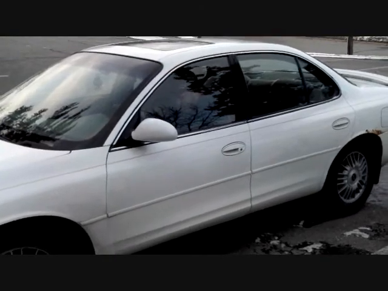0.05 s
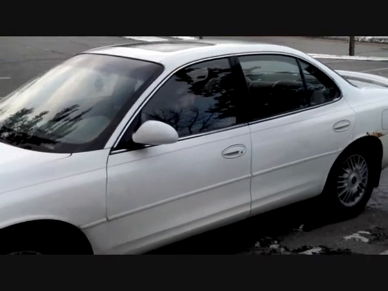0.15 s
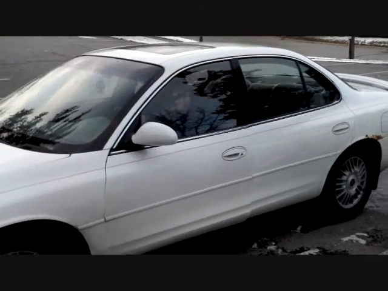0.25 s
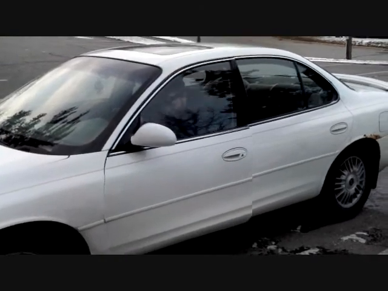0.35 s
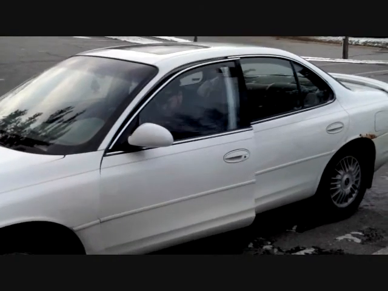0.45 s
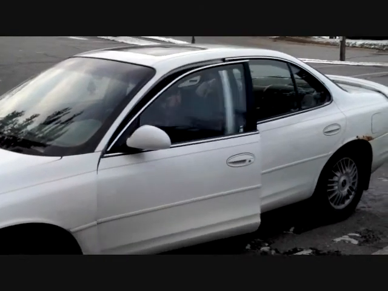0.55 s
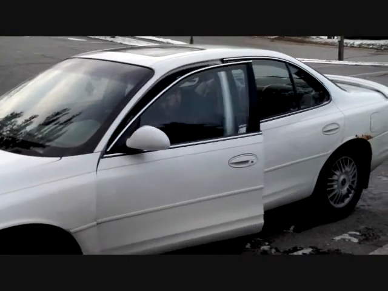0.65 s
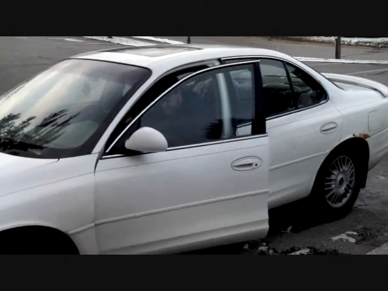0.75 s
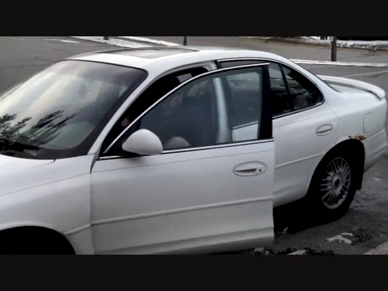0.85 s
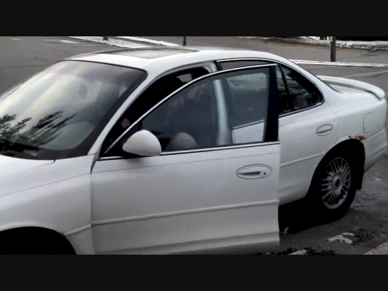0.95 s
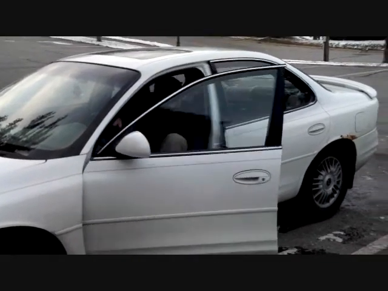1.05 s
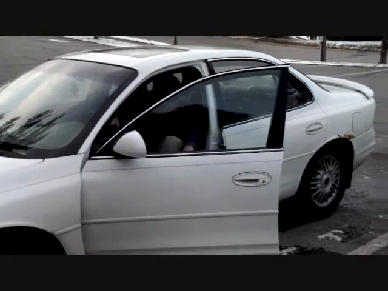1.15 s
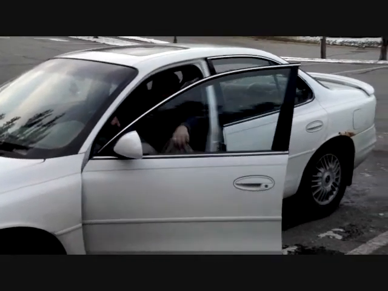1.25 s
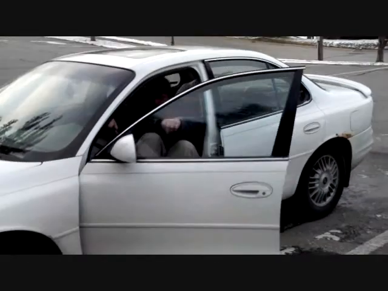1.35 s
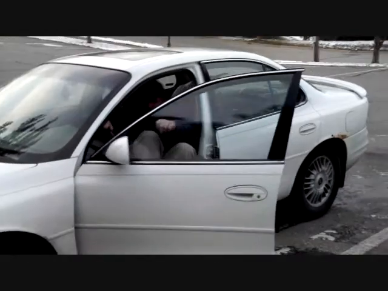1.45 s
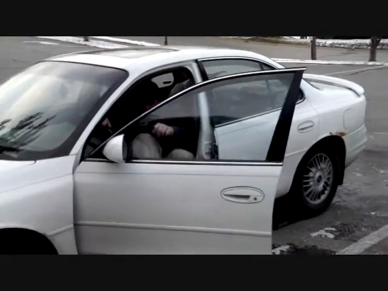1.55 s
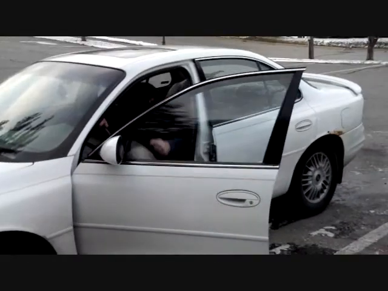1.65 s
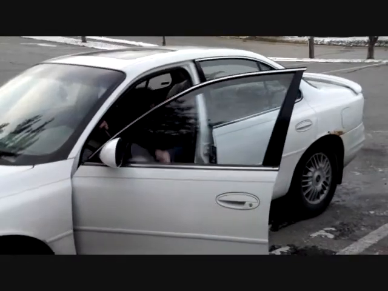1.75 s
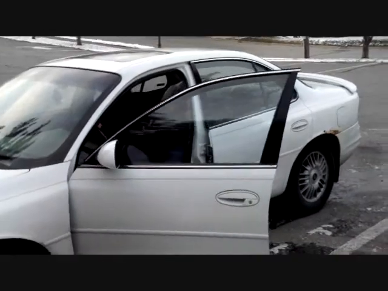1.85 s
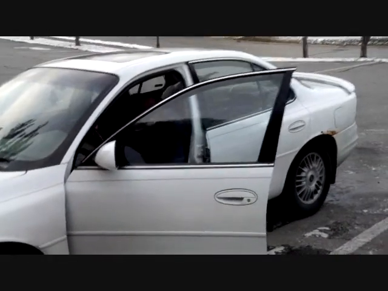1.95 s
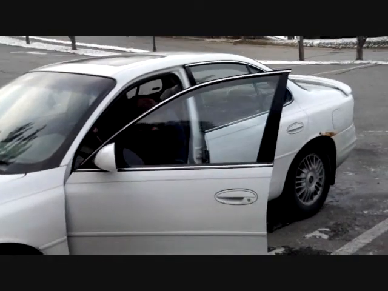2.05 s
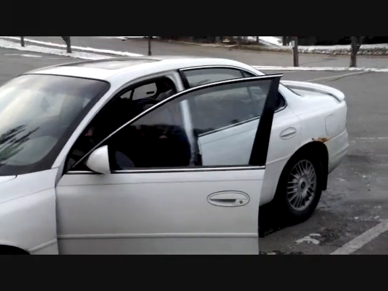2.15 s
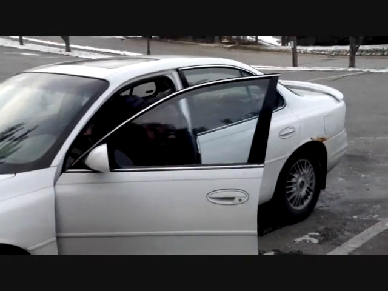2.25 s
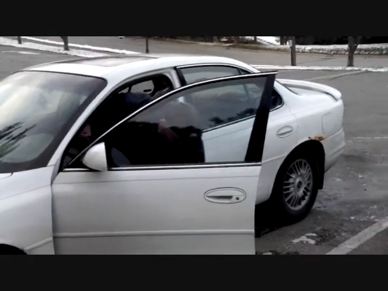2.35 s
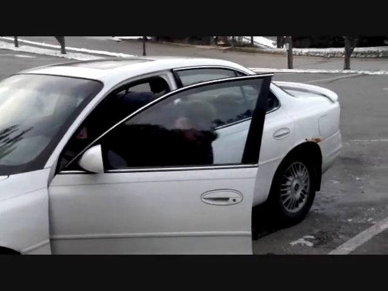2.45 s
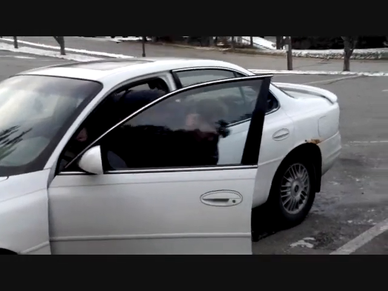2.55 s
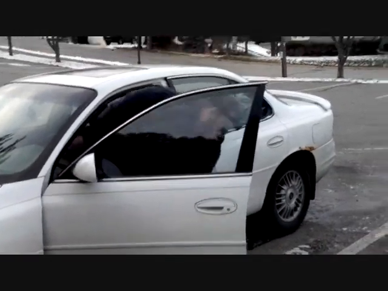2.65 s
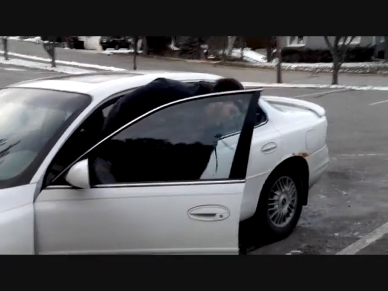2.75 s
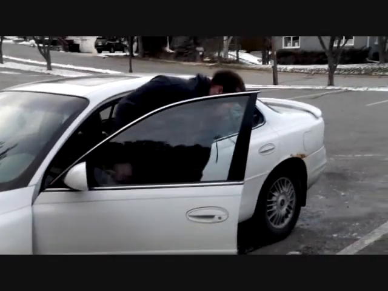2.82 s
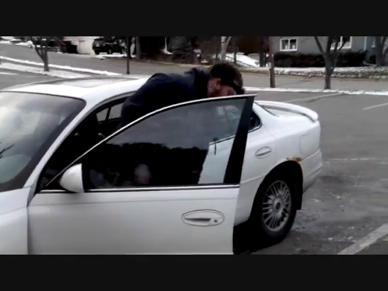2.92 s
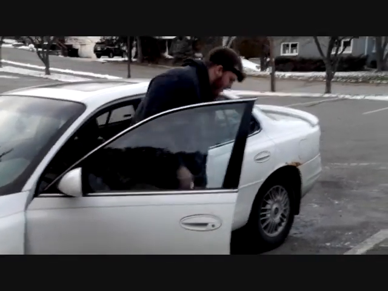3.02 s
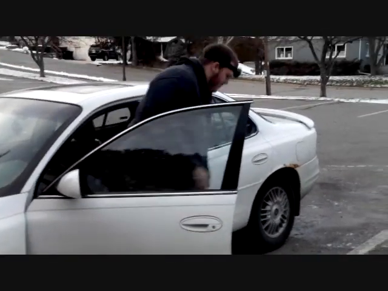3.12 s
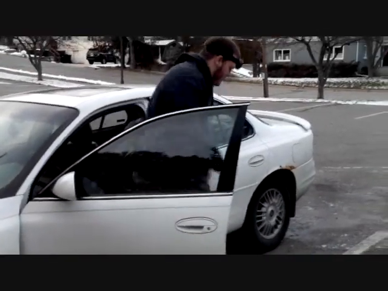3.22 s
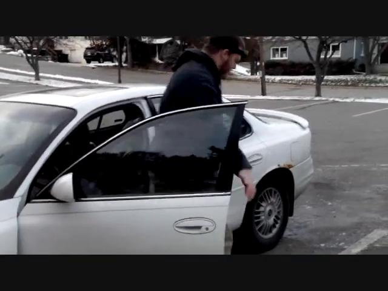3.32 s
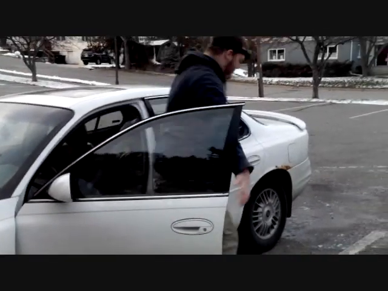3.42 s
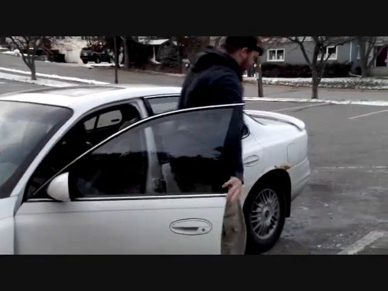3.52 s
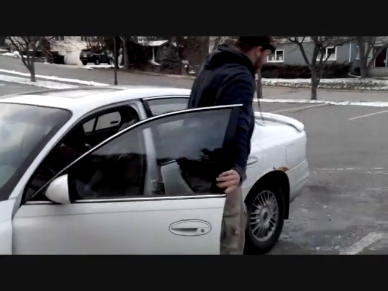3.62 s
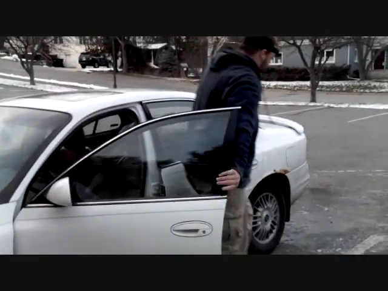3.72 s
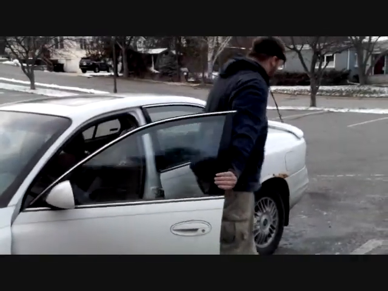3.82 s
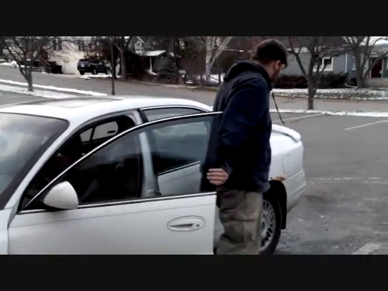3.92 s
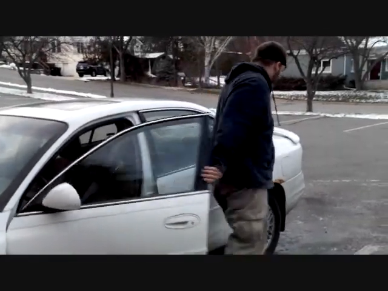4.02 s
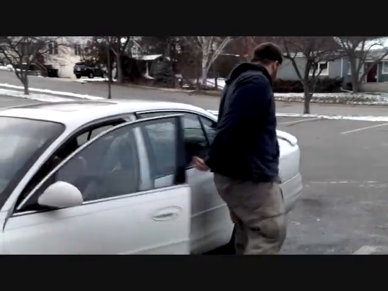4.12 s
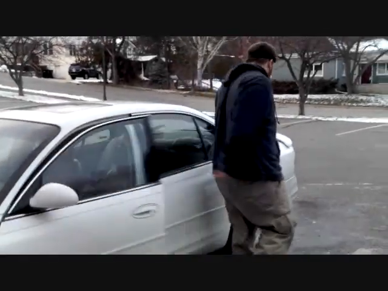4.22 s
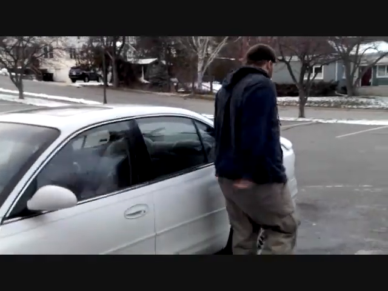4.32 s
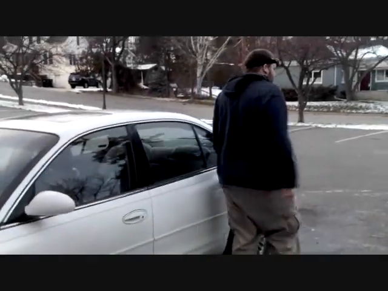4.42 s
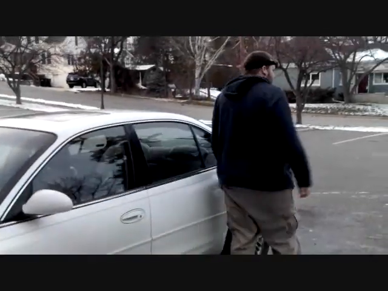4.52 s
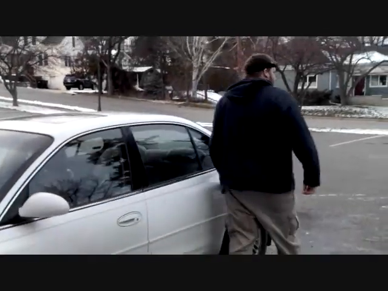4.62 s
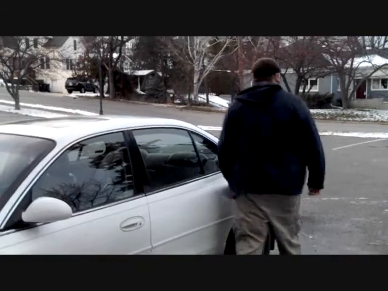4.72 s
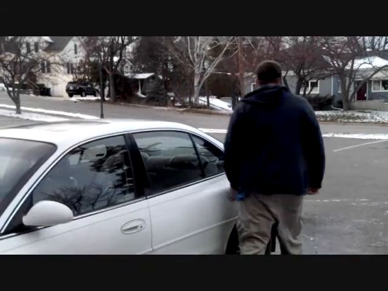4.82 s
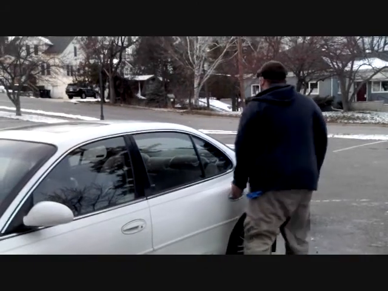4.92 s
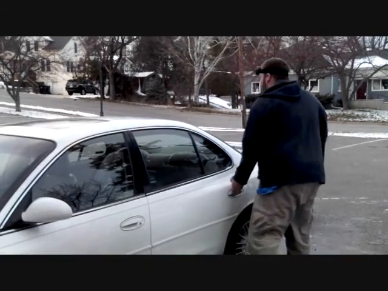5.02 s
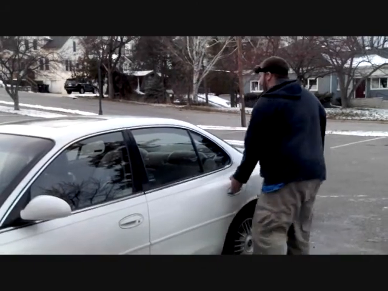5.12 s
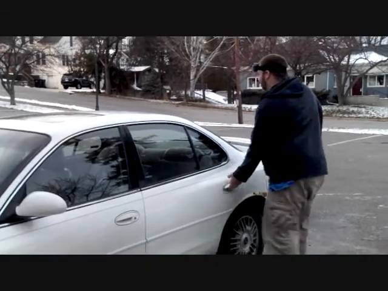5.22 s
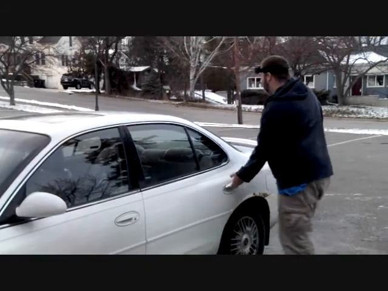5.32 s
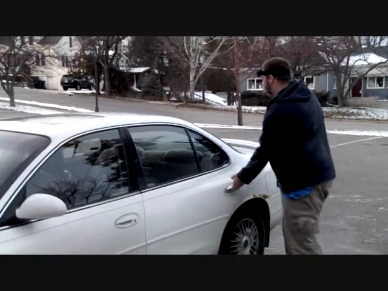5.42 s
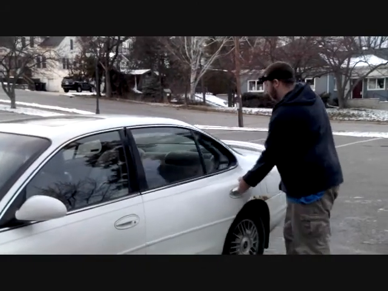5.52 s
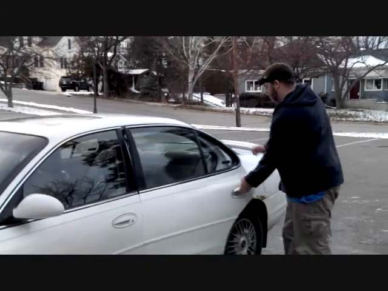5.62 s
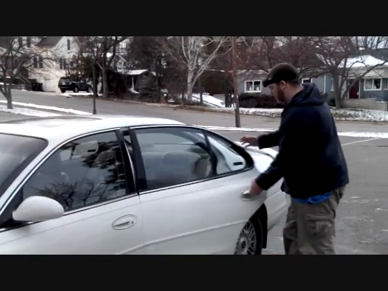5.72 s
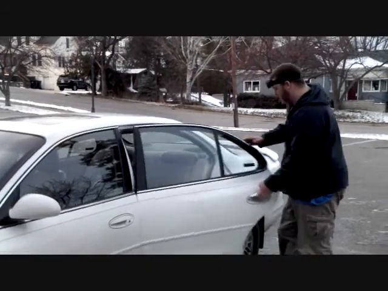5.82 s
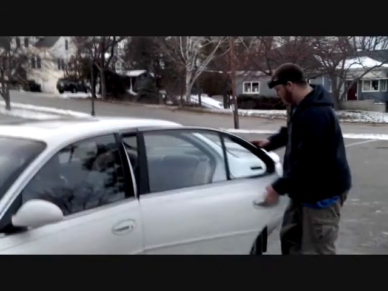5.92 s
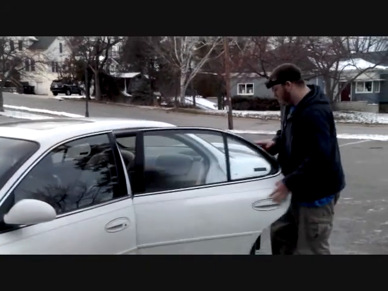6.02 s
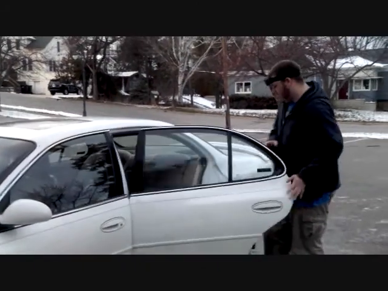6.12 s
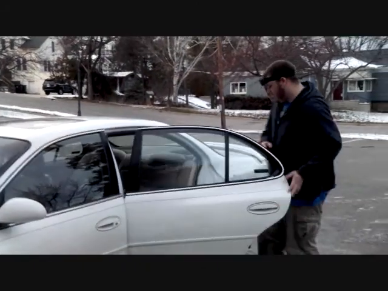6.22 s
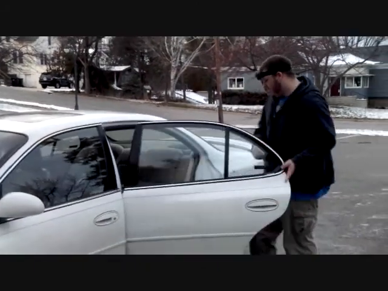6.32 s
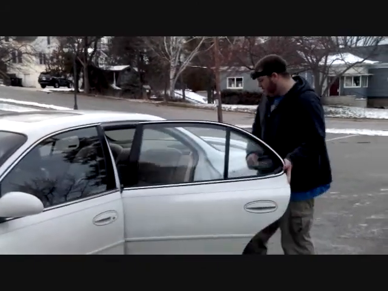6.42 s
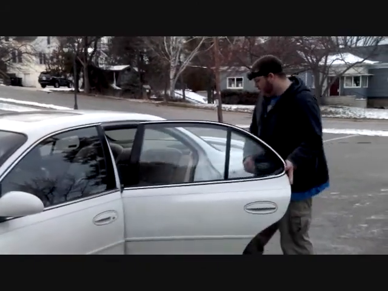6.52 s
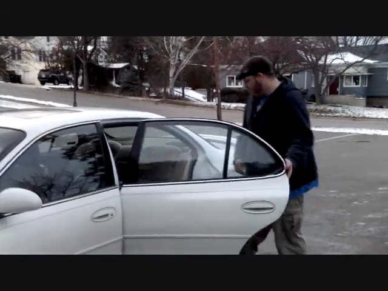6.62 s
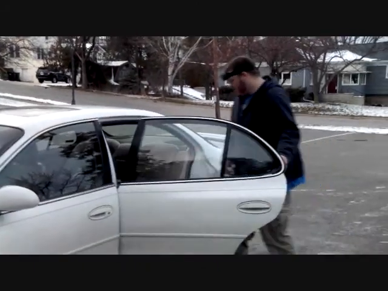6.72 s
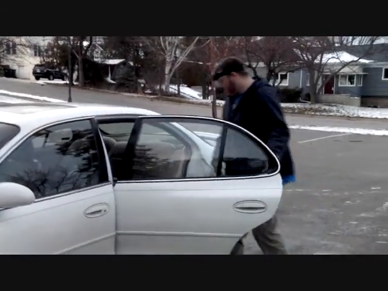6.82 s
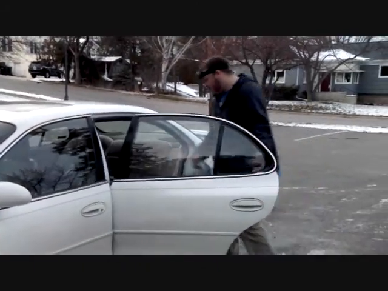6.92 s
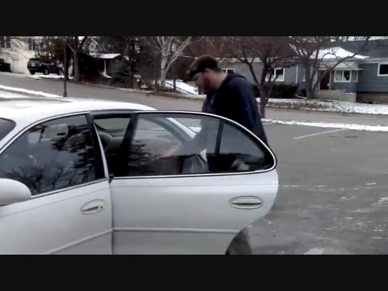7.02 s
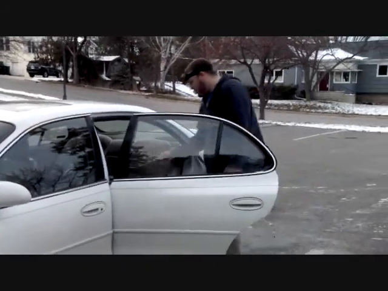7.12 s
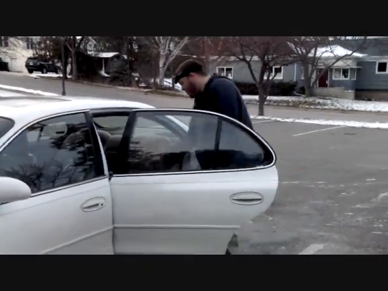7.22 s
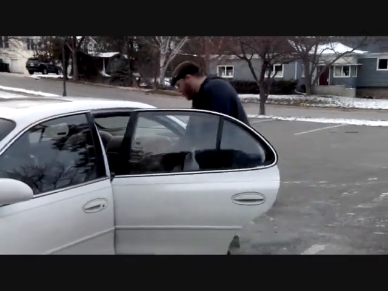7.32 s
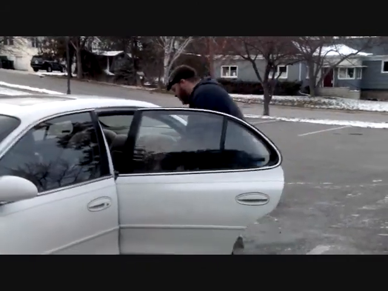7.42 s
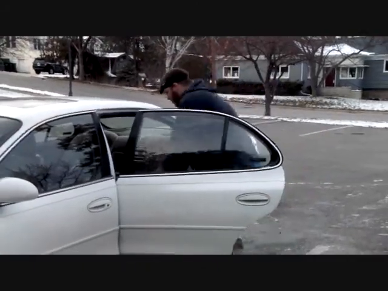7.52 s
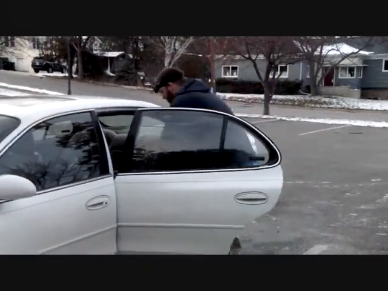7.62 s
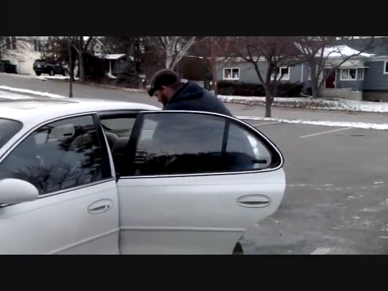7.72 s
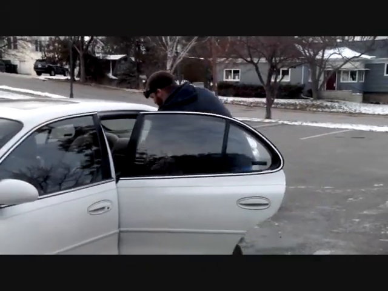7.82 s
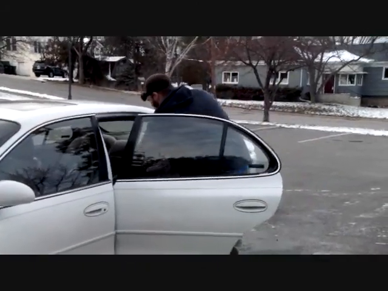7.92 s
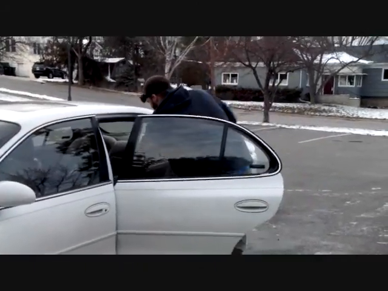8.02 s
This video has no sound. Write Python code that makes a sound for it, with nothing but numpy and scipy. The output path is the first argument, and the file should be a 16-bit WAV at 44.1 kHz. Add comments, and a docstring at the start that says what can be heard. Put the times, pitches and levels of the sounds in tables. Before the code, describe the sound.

A car door unlatches softly and swings open with a clunk. Shoes scuff on asphalt and small metal pieces like keys chink faintly. The hinge squeaks briefly and knocks several times, then the door slams hard enough to overload the nearby microphone. After a few light steps, a handle snaps and a second door pops open. Faint traffic and hiss fill the open parking lot.

```python
"""Car doors in an open parking lot: each contact rings their sheet metal, glass and trim.
The front door unlatches, swings through its hinge notches, is pushed back and slams, pumping the cabin
air. Shoes scuff on asphalt, small metal chinks, then the rear handle snaps and the rear door pops open.
Distant traffic and a faint machine whine lie beneath; the loudest blows overload the microphone."""
import sys
import numpy as np
from scipy import signal
from scipy.fft import rfft, irfft, next_fast_len
from scipy.io import wavfile
from scipy.ndimage import uniform_filter1d

SR = 44100
rng = np.random.default_rng(int(sys.argv[2]) if len(sys.argv) > 2 else 0)


def master_out(mix):
    """Clip the mix to full scale and print it as 16-bit PCM to the path in sys.argv[1]."""
    frames = np.transpose(np.atleast_2d(mix))
    ceiling = np.clip(frames, -1, 1)
    pcm = np.round(ceiling * 32767).astype(np.int16)
    wavfile.write(sys.argv[1], SR, pcm)


N = 355357
TIME_S = np.arange(N) / SR
RING_S = TIME_S[:int(.7 * SR)]  # time axis of one event

# door metal, glass and trim: pitch_hz, level_db, t60_s
DOOR_MODES = [(99.6, -13, 0.3), (122.6, -11, 0.28), (139.2, -8, 0.35), (174, -10.5, .22), (212, -11, 0.38),
              (234.8, -11, 0.31), (286.1, -9.5, 0.28), (352.7, -5, 0.15), (410, -6, 0.18),
              (456.6, -4.5, 0.13), (481.8, -3.5, 0.15), (512, -7.5, 0.21), (635.6, -12.5, 0.22),
              (708, -11, 0.11), (789, -14, 0.099), (892, -7, 0.083), (986, -17.5, 0.084),
              (1207, -17.5, 0.095), (1360, -23, 0.16), (1488, -17.5, 0.15), (1580, -20, 0.058),
              (2527, -25, 0.082), (3090, -27.5, 0.1), (3800, -27, 0.091), (4010, -24, 0.15)]
# dense small modes between them: freq_hz, density_db
DOOR_DENSE = [(55, -24), (105, -1), (450, 1.5), (900, -10), (1550, -11.5), (1900, -21.5), (4100, -21.5),
              (4600, -24.5), (7500, -28.5)]


def door_blow(peak_db, bass_db, treble_db, panel_hz, ring_scale, chatter_s,
              bass_hz=220, treble_hz=2200, panel_db=5, panel_q=6.7, dense_db=-6):
    """One contact and a brief chatter of metal on metal ring the door."""
    body = modes(DOOR_MODES, ring_scale)
    body += undb(dense_db) * noise(DOOR_DENSE, RING_S) * fade(0.17 * ring_scale)
    x = signal.fftconvolve(contact(0.11, chatter_s), body)[:len(RING_S)]
    x *= 1 - np.exp(-RING_S / 0.00013)  # rubber cushions the onset
    # heavy blows move the whole door, hard ones wake the treble, the struck panel speaks most
    hz = freqs(x)
    tilt_db = bass_db / (1 + (hz / bass_hz) ** 4) + treble_db / (1 + (treble_hz / hz) ** 4)
    panel = 1 + undb(panel_db) / (1 + 1j * panel_q * (hz / panel_hz - panel_hz / hz))
    x = irfft(rfft(x) * undb(tilt_db) * panel, len(x))
    # a free door radiates little deep bass
    x = signal.sosfilt(signal.butter(2, 75, "high", fs=SR, output="sos"), x)
    return peak(x * (1 - RING_S / RING_S[-1]), peak_db)


# trapped cabin air: pitch_hz, level_db, t60_s
CABIN_MODES = [(35.7, -23, 0.34), (61.5, -3.5, 0.15), (87.5, -15, 0.54), (97.1, -11.5, 0.45)]
# loose trim and window glass: freq_hz, density_db
TRIM_SPECTRUM = [(60, 3), (100, 24), (260, 14), (700, -1), (1400, 0.5), (1900, -13), (3400, -10),
                 (4050, -3), (4500, -14.5), (7500, -17.5)]


def slam(start_s=4.352, striker_lead_s=.011, rebound_s=.018, cabin_lag_s=.007):
    """Latch meets striker; the door lands, pumps the cabin, shakes the trim and rebounds on its seal."""
    out = np.zeros(N)
    striker = door_blow(-7, bass_db=-13, treble_db=6.5, panel_hz=1100, ring_scale=0.62, chatter_s=0.0073)
    add(out, start_s - striker_lead_s, striker)
    landing = door_blow(6, bass_db=5.5, treble_db=6.5, panel_hz=810, ring_scale=.55, chatter_s=.005)
    add(out, start_s, landing)
    for k in range(2):  # the second is weaker and duller
        rebound = door_blow(-0.5 - 5 * k, bass_db=5, treble_db=3 - 27.5 * k, panel_hz=255,
                            ring_scale=0.83, chatter_s=.004, panel_db=10)
        add(out, start_s + (k + 1) * rebound_s, rebound)
    cabin = modes(CABIN_MODES, ring_scale=0.94, scatter_db=1.0)
    trim = undb(-19.5) * noise(TRIM_SPECTRUM, RING_S) * fade(0.56)
    add(out, start_s + cabin_lag_s, cabin + trim)
    return out


# sprung check arm of the front hinge: pitch_hz, level_db, t60_s
ARM_MODES = [(385, -2, 0.098), (830, -13, 0.11), (875, 2.5, 0.075), (1353, -9, 0.13), (1402, -9.5, 0.15),
             (1507, -11.5, 0.12), (1606, -10.5, 0.084)]
# its notches: start_s, door_db, arm_db, treble_db, panel_hz
NOTCHES = [(1.375, -16, -12, 3, 432), (3.879, -14.5, -15, -1, 720), (3.903, -2.5, -12, -4, 500),
           (3.927, 1.5, -14, -2.5, 427), (3.967, -10.5, -23.5, -2, 370), (4.119, -2.5, -35, -3.5, 357)]


def hinge(arm_lag_s=.002, drop_lag_s=.0075, drop_db=-4.5):
    """At each notch the roller strikes, the sprung arm rings and the roller drops in."""
    out = np.zeros(N)
    for start_s, door_db, arm_db, treble_db, panel_hz in NOTCHES:
        strike = door_blow(door_db, bass_db=5, treble_db=treble_db, panel_hz=panel_hz,
                           ring_scale=0.87, chatter_s=0.0023, bass_hz=150, panel_db=6.5)
        add(out, start_s, strike)
        add(out, start_s + arm_lag_s, peak(modes(ARM_MODES, scatter_db=3.0), arm_db))
        drop = door_blow(door_db + drop_db, bass_db=-12, treble_db=treble_db, panel_hz=panel_hz,
                         ring_scale=0.69, chatter_s=0.0027, bass_hz=260)
        add(out, start_s + drop_lag_s, drop)
    return out


# front and rear latch: start_s, click_db, pop_lag_s, pop_db
LATCHES = [(.511, -22, .013, -23), (5.976, -18.5, 0.0046, -19)]
# rear door skin: pitch_hz, level_db, t60_s
SKIN_MODES = [(200, -17, 0.14)]


def latches(skin_release_s=5.980):
    """Each latch clicks and its door pops off the seal; the rear door's skin springs back."""
    out = np.zeros(N)
    for start_s, click_db, pop_lag_s, pop_db in LATCHES:
        click = door_blow(click_db, bass_db=8, treble_db=7.5, panel_hz=840,
                          ring_scale=0.31, chatter_s=0.0052, treble_hz=2700, dense_db=0.5)
        add(out, start_s, click)
        pop = door_blow(pop_db, bass_db=5, treble_db=-3, panel_hz=400, ring_scale=0.68, chatter_s=0.0046)
        add(out, start_s + pop_lag_s, pop)
    add(out, skin_release_s, modes(SKIN_MODES, scatter_db=3.0))
    return out


# door rattles: start_s, level_db, treble_db, panel_hz, ring_scale
RATTLES = [(1.475, -26.5, 5.5, 1260, 0.46), (1.522, -28, 6.5, 320, 0.76), (3.807, -18, -7, 760, 1.8),
           (4.023, -22.5, -9, 1210, 3.3), (4.072, -16, -2, 408, 2.7), (4.448, -16, -9.5, 960, 0.56)]


def rattles():
    """Loose parts chatter against the panels."""
    out = np.zeros(N)
    for start_s, level_db, treble_db, panel_hz, ring_scale in RATTLES:
        add(out, start_s, door_blow(level_db, bass_db=1.5, treble_db=treble_db, panel_hz=panel_hz,
                                    ring_scale=ring_scale, chatter_s=0.0058))
    return out


# knocks, the first from the rear handle: start_s, thud_db, pitch_ratio, snap_db
KNOCKS = [(5.7937, -6, 0.95, -10), (7.1173, -13.5, 0.85, -36)]
# their hollow body: freq_hz, level_db
KNOCK_SPECTRUM = [(70, -21), (280, -6), (540, 2), (780, 1.5), (900, -5), (1010, -2.5), (1150, -20),
                  (1550, -17.5), (4000, -54)]


def knocks():
    """A heavily damped plastic thud with a hard snap on top."""
    out = np.zeros(N)
    for start_s, thud_db, pitch_ratio, snap_db in KNOCKS:
        thud = impulse([(hz * pitch_ratio, db) for hz, db in KNOCK_SPECTRUM])
        snap = band(rng.standard_normal(len(RING_S)) * fade(0.013), 1300, 8200)
        add(out, start_s, peak(thud, thud_db))
        add(out, start_s, peak(snap, snap_db))
    return out


# one track for the seal, one for the hinge: time_s, pitch_hz, level_db
SQUEAK_TRACKS = [
    [(.385, 2150, -60), (.42, 2240, -48), (.441, 2230, -48), (.456, 2700, -60)],
    [(3.83, 1095, -36), (3.85, 1058, -33), (3.878, 1030, -40)],
]


def squeaks():
    """Stick-slip: an unsteady tone with a weak octave."""
    out = np.zeros(N)
    for track in SQUEAK_TRACKS:
        time_s, pitch_hz, level_db = np.transpose(track)
        unsteady_hz = np.interp(TIME_S, time_s, pitch_hz) * (1 + 0.0097 * walk(280))
        phase = 2 * np.pi * np.cumsum(unsteady_hz) / SR
        out += envelope(time_s, level_db) * (np.sin(phase) + 0.098 * np.sin(2 * phase))
    return out


# shoe and hand taps: start_s, level_db
TAPS = [(1.701, -39.5), (2.224, -30.5), (4.804, -24), (5.292, -30.5), (5.338, -28.5), (5.417, -27),
        (7.07, -39), (7.246, -35), (7.846, -37.5)]
# grit under a sole: start_s, level_db, pitch_hz, decay_s
SCUFFS = [(.374, -34, 4500, 0.0046), (2.227, -41, 3500, 0.054), (2.71, -42.5, 4020, 0.068),
          (2.766, -33, 1700, 0.012), (4.894, -34, 3520, 0.01), (5.457, -33, 4160, 0.011)]


def taps_and_scuffs():
    """Shoes and hands tap dully; soles scrape bright grit."""
    out = np.zeros(N)
    for start_s, level_db in TAPS:
        add(out, start_s, grain_burst(level_db, pitch_hz=880, decay_s=.006, strike=5.8))
    for start_s, level_db, pitch_hz, decay_s in SCUFFS:
        add(out, start_s, grain_burst(level_db, pitch_hz, decay_s))
    return out


def grain_burst(peak_db, pitch_hz, decay_s, strike=0):
    """Decaying grains around one pitch, with an optional first strike."""
    grains = rng.standard_normal(len(RING_S)) * undb(2.06 * rng.exponential(size=len(RING_S)))
    grains[0] += strike
    burst = band(grains * np.exp(-RING_S / decay_s), pitch_hz / 1.75, pitch_hz * 1.16, order=1)
    return peak(band(burst, pitch_hz / 4, pitch_hz * 2.6), peak_db)


# metal contacts: start_s, level_db
CHINKS = [(1.85, -45), (2.066, -38), (2.706, -40), (2.77, -34), (2.798, -38.5), (2.867, -42.5),
          (3.291, -42.5), (3.322, -39)]
# their ring: pitch_hz, level_db, t60_s
CHINK_MODES = [(1570, 0, 0.056), (2750, -4.5, 0.063), (3770, 0.5, 0.07), (4030, -3, 0.14),
               (5370, -6, 0.049)]


def chinks():
    """Small metal parts, like keys, touch, rattle briefly and ring."""
    out = np.zeros(N)
    for start_s, level_db in CHINKS:
        touch = contact(0.083, chatter_s=0.012)
        ring = modes(CHINK_MODES, ring_scale=0.55, detune=0.015)
        scrape = 1.25 * band(rng.standard_normal(len(RING_S)), 1500, 7100) * fade(0.037)
        chink = signal.fftconvolve(touch, ring + scrape)[:len(RING_S)]
        add(out, start_s, peak(chink, level_db))
    return out


# dull rubs: centre_s, level_db, pitch_hz, half_width_s
RUBS = [(.265, -40, 180, 0.031), (1.07, -40, 374, 0.048), (2.412, -40.5, 328, 0.019),
        (5.004, -42.5, 260, 0.068), (5.2, -43, 238, .04)]


def rubs(edge_ratio=1.14):
    """Friction swells in a low band as someone shifts weight and handles the car."""
    out = np.zeros(N)
    for centre_s, level_db, pitch_hz, half_width_s in RUBS:
        friction = unit(band(rng.standard_normal(N), pitch_hz / edge_ratio, pitch_hz * edge_ratio))
        out += undb(level_db) * friction * swell(centre_s, half_width_s)
    return out


def lot_echo(x, echo_db=-27, t60_s=0.51, rise_s=0.02):
    """Add weak, dull scatter from the car body and distant house fronts."""
    tail = band(rng.standard_normal(len(RING_S)), 72, 2200, order=1)
    tail *= fade(t60_s) * (1 - np.exp(-RING_S / rise_s))
    return x + undb(echo_db) * signal.fftconvolve(x, tail / np.linalg.norm(tail))[:N]


# distant road noise: freq_hz, density_db
TRAFFIC_SPECTRUM = [(25, -20), (45, -5), (75, 1.5), (115, 1), (180, -3.5), (290, -2.5), (450, -9),
                    (750, -10.5), (1100, -18.5), (1800, -32.5), (4000, -42)]


def traffic(bed_db=-44, vehicle_db=-41, flutter_db=0.73):
    """One vehicle nears and recedes over a bed of distant traffic."""
    vehicle = undb(vehicle_db) * swell(centre_s=0.92, half_width_s=1)
    rumble = noise(TRAFFIC_SPECTRUM, TIME_S) * np.hypot(undb(bed_db), vehicle)
    return rumble * undb(flutter_db * walk(14))


# whine envelope: time_s, level_db
WHINE_LEVELS = [(.5, -67), (.9, -62), (1.25, -55.5), (1.7, -67), (2.0, -55), (2.55, -67), (3.1, -62.5),
                (3.651, -59), (4.2, -64)]
# lower hums: pitch_hz, level_db, centre_s, half_width_s
HUMS = [(721, -53, 0.48, .9), (497, -52.5, 2.46, .33), (322, -49.5, 3.23, 0.35), (109.6, -48.5, 2.6, 1)]


def machines(whine_hz=1368):
    """Far machines whine and hum, coming and going."""
    whine = envelope(*np.transpose(WHINE_LEVELS)) * wavering_tone(whine_hz)
    hums = sum(undb(level_db) * swell(centre_s, half_width_s) * wavering_tone(pitch_hz)
               for pitch_hz, level_db, centre_s, half_width_s in HUMS)
    return whine + hums


# microphone noise: freq_hz, density_db
HISS_SPECTRUM = [(100, 1), (1500, 4), (2500, 1.5), (4000, 2.5), (5500, 1), (7400, 1.5), (8000, -6.5)]


def hiss(level_db=-55.5):
    """Steady microphone hiss."""
    return undb(level_db) * noise(HISS_SPECTRUM, TIME_S)


def contact(chatter_gain, chatter_s):
    """A unit impulse followed by decaying chatter."""
    force = chatter_gain * rng.standard_normal(len(RING_S)) * np.exp(-RING_S / chatter_s)
    force[0] += 1
    return force


def modes(table, ring_scale=1, scatter_db=2.5, detune=0.012):
    """Decaying sines of alternating sign; levels and pitches scatter per blow."""
    out = np.zeros(len(RING_S))
    for k, (pitch_hz, level_db, t60_s) in enumerate(table):
        level_draw, pitch_draw = rng.standard_normal(2)
        sine = np.sin(2 * np.pi * pitch_hz * (1 + detune * pitch_draw) * RING_S)
        out += (-1) ** k * undb(level_db + scatter_db * level_draw) * sine * fade(t60_s * ring_scale)
    return out


def wavering_tone(pitch_hz):
    """A sine that wavers in level and pitch."""
    gain = undb(2.1 * walk(6.96))
    return gain * np.sin(2 * np.pi * np.cumsum(pitch_hz + 2.59 * walk(11)) / SR)


def impulse(spectrum, size=4096):
    """Minimum-phase response with a given spectrum."""
    cepstrum = irfft(np.log(bin_gains(spectrum, np.zeros(size))))
    cepstrum[1:size // 2] *= 2
    cepstrum[size // 2 + 1:] = 0
    return irfft(np.exp(rfft(cepstrum)))


def noise(spectrum, time_s):
    """Shaped noise of rms 1, as long as time_s."""
    white = rng.standard_normal(next_fast_len(len(time_s)))
    shaped = irfft(rfft(white) * bin_gains(spectrum, white), len(white))
    return unit(shaped[:len(time_s)])


def bin_gains(spectrum, x):
    """Rows of freq_hz, level_db as gains on the FFT bins of x."""
    freq_hz, level_db = np.transpose(spectrum)
    return undb(np.interp(np.log(freqs(x)), np.log(freq_hz), level_db))


def freqs(x):
    """FFT bin frequencies, at least 1 Hz."""
    return np.maximum(np.fft.rfftfreq(len(x), 1 / SR), 1)


def band(x, low_hz, high_hz, order=2):
    """Causal band-pass."""
    edges_hz = [low_hz, min(high_hz, SR / 2 - 1)]
    return signal.sosfilt(signal.butter(order, edges_hz, "band", fs=SR, output="sos"), x)


def walk(rate_hz):
    """Smooth random drift, spread 1."""
    step = int(SR / rate_hz)
    held = np.repeat(rng.standard_normal(N // step + 1), step)
    return unit(uniform_filter1d(held, step)[:N])


def envelope(time_s, level_db):
    """Gain through breakpoints, zero outside."""
    return np.interp(TIME_S, time_s, undb(level_db), left=0, right=0)


def swell(centre_s, half_width_s):
    """Gaussian rise and fall."""
    return np.exp(-((TIME_S - centre_s) / half_width_s) ** 2 / 2)


def fade(t60_s):
    """Exponential decay."""
    return undb(-60 * RING_S / t60_s)


def undb(db):
    """Decibels to gain."""
    return 10 ** (np.asarray(db) / 20)


def unit(x):
    """Scale to rms 1."""
    return x / np.std(x)


def peak(x, db):
    """Scale to a peak level."""
    return x * undb(db) / np.abs(x).max()


def add(out, start_s, x):
    """Mix x in at start_s."""
    i = int(start_s * SR)
    out[i:i + len(x)] += x[:N - i]


def scene():
    """Mono mix; knocks, rubs and background stay dry."""
    doors = latches() + hinge() + rattles() + slam()
    echoed = lot_echo(doors + taps_and_scuffs() + chinks() + squeaks())
    return (echoed + knocks() + rubs() + traffic() + machines() + hiss())[None]


def record(dry, offset=.125, ceiling=.74, knee_order=8, top_hz=7720):
    """An off-centre input flattens the loudest waves and cuts the top."""
    biased = dry + offset
    clipped = biased / (1 + np.abs(biased / ceiling) ** knee_order) ** (1 / knee_order)
    low_pass = signal.ellip(12, .2, 75, top_hz, fs=SR, output="sos")
    return signal.sosfilt(low_pass, clipped - offset) + offset


dry = scene()
out = record(dry)
master_out(out)
```